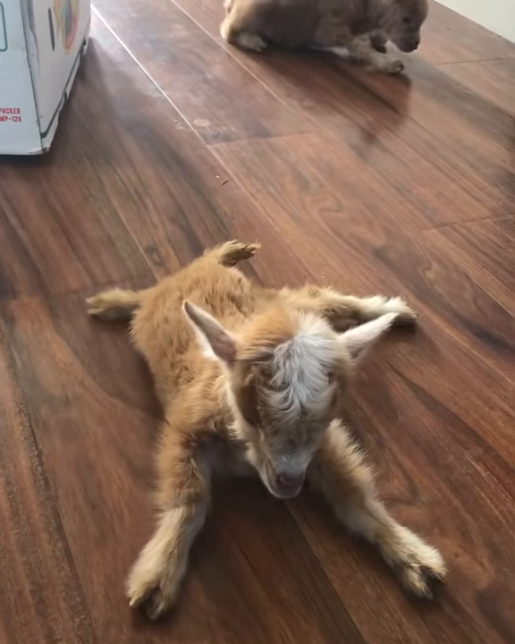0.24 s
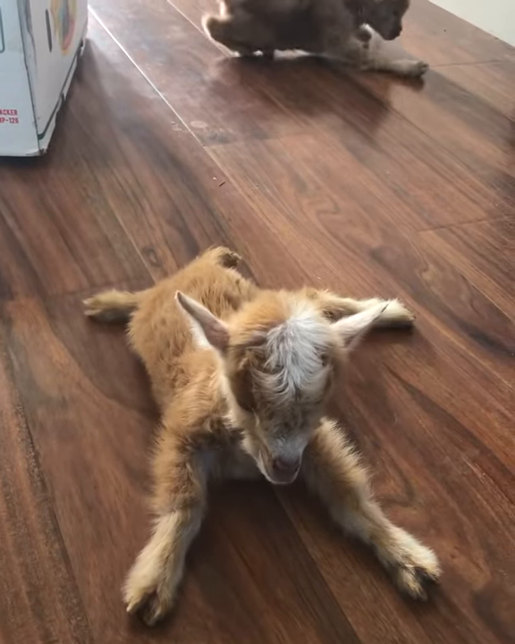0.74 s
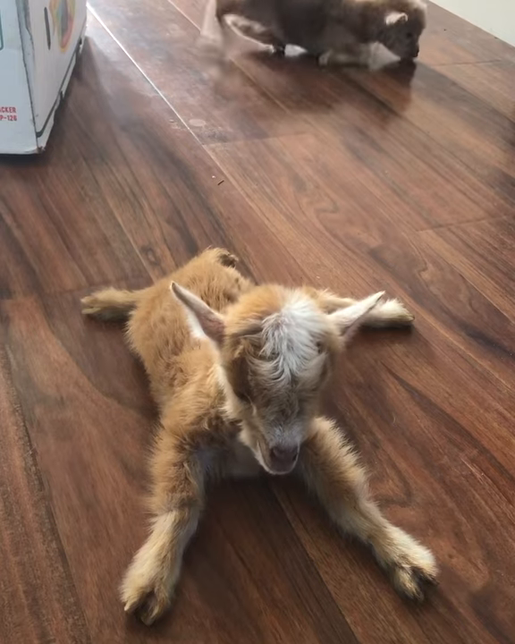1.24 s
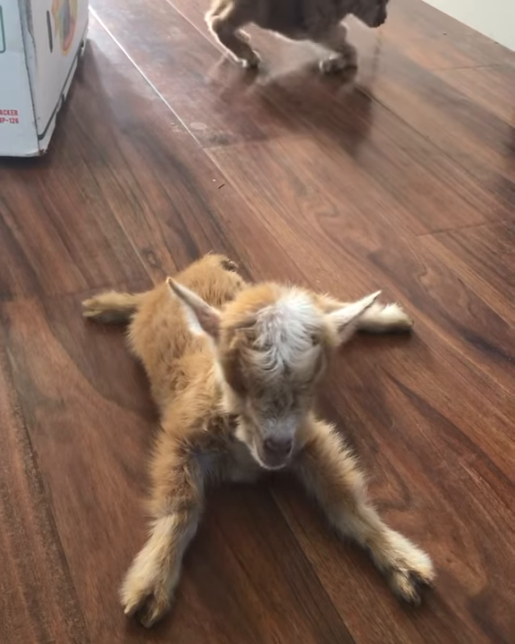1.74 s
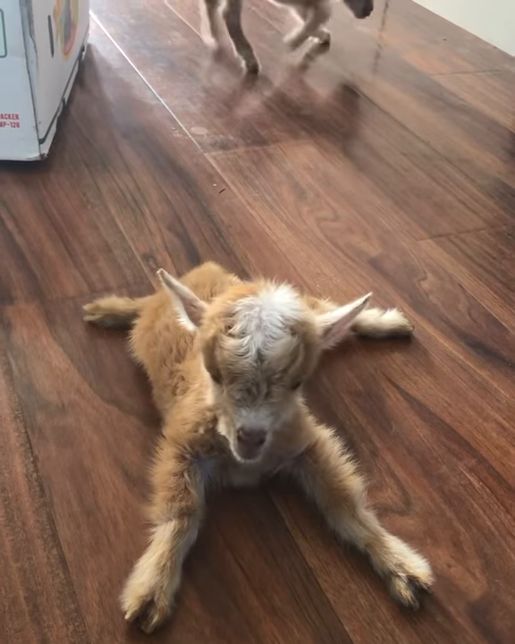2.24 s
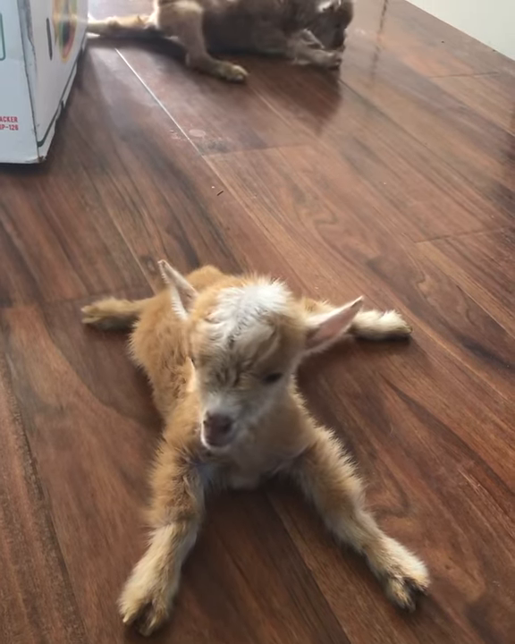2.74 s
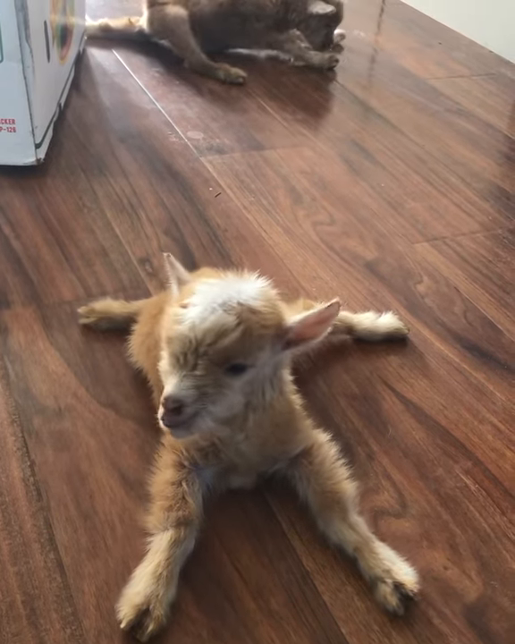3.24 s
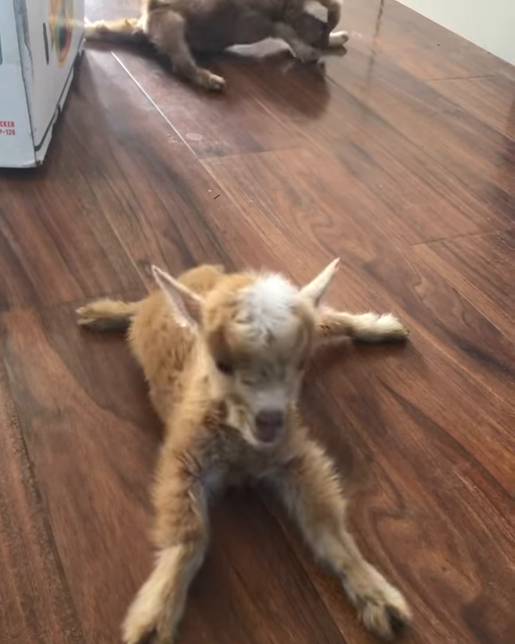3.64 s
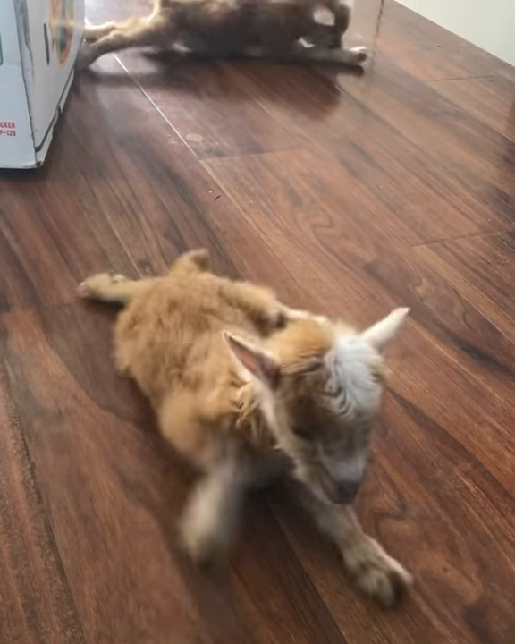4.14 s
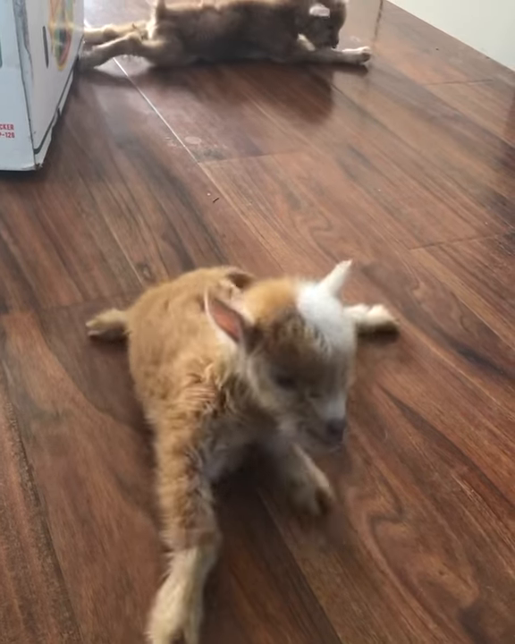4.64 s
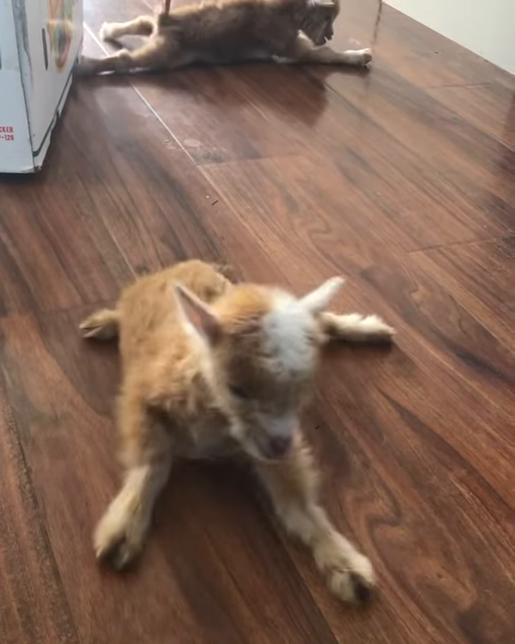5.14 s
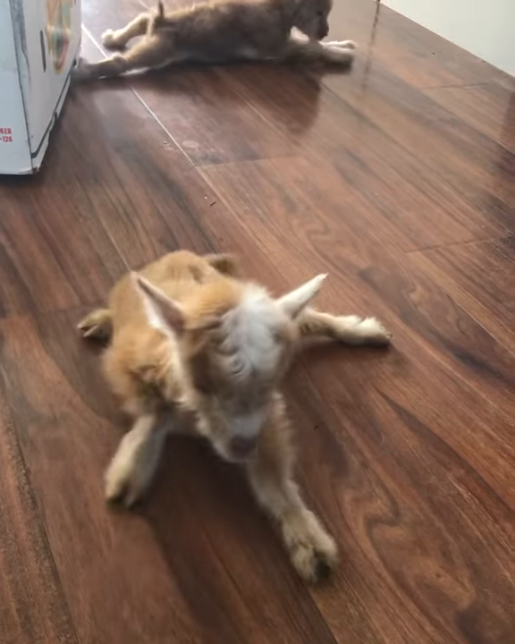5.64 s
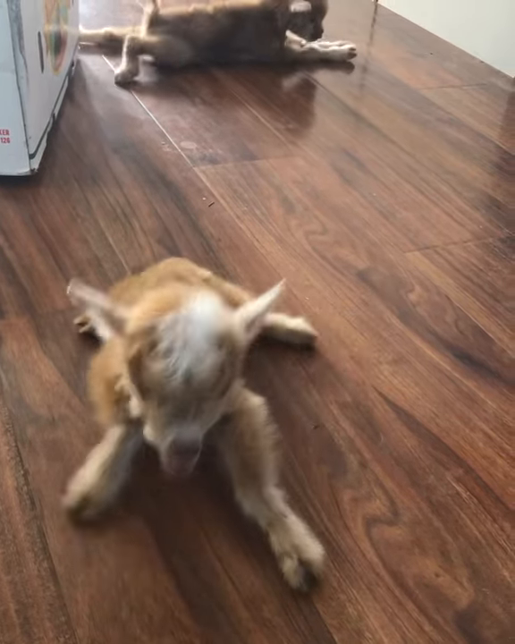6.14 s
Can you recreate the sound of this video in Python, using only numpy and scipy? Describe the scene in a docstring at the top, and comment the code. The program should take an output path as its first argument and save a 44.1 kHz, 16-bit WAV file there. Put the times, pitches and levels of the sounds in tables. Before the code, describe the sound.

A quiet room with low, steady air and a very faint thin appliance whine, heard through one close microphone, centred. At first only faint scuffs; from 0.9 to 1.3 s another kid stumbles farther off, with small hoof ticks, dull plank knocks and low floor rumble. A light knock at 2.35 s leads to a heavy woody thud at 2.57 s. The near goat kid then hums through closed lips and bleats, thin, high and nasal: short at 2.9 s, slightly longer at 3.5 s, the longest and quivering from 4.07 to 4.5 s, and a clipped one at 4.84 s. Hooves knock and scrape around 4.0 s, tap at 4.4 s, slide softly at 4.65 and 5.25 s, and click sharply at 5.4 s. From 5.56 to 6.15 s a strained, higher squeal swells, cracking twice into a whistle-like register and settling loud and clearer. A short scuff at 6.2 s and a tiny hoof squeak at 6.33 s end it.

```python
"""Newborn goat bleating on a plank floor

Close on a kid in a quiet room: four thin bleats led in by hums, then a squeal that cracks between registers.
The voice is a stack of harmonics under throat resonances, with rasping breath. Hooves tick (noise bursts) and
slide (swelling friction noise); a second kid stumbles and drops, heard as ringing planks and floor rumble.
Low room air and a faint appliance whine lie behind; one microphone feeds both sides."""
import sys
import numpy as np
from scipy import signal
from scipy.fft import rfft, irfft, next_fast_len
from scipy.io import wavfile
from scipy.ndimage import map_coordinates

SR = 44100
rng = np.random.default_rng(int(sys.argv[2]) if len(sys.argv) > 2 else 0)


def inscribe(sig):
    """Save sig as 16-bit PCM at rate SR to the path in sys.argv[1].

    A 1-D sig is mono; a 2-D sig holds one channel per row.
    Samples are clipped to [-1, 1] before scaling.
    """
    pcm = np.round(np.clip(np.atleast_2d(sig).T, -1, 1) * 32767)
    wavfile.write(sys.argv[1], SR, pcm.astype(np.int16))


N = 281358
TIME = np.arange(N) / SR
CUTOFF_HZ = 15750
BLEAT_ROOM_DB = -3   # room on the bleats and hums, relative to the direct voice


def from_db(db):
    """Decibels to gain."""
    return 10 ** (np.asarray(db) / 20)


def rms_one(x):
    """Scale to unit power."""
    return x / np.sqrt(np.mean(x ** 2) + 1e-20)


def in_time(rows, t):
    """Each column of a curve at the times t."""
    s, *columns = np.transpose(rows)
    return [np.interp(t, s, column) for column in columns]


def at_hz(points, hz):
    """Read a spectrum on a log-frequency axis."""
    f, value = np.transpose(points)
    return np.interp(np.log(hz), np.log(f), value)


def drift(rate, size):
    """Smooth chance that takes a new value rate times a second (below 2000); rms 1."""
    at = np.arange(size) * rate / SR
    values = rng.standard_normal(size // 20 + 4)
    return rms_one(map_coordinates(values, [at], order=3, mode="nearest"))


def coloured(x, spectrum):
    """Give a noise the stated spectrum; rms 1."""
    size = next_fast_len(len(x))
    hz = np.maximum(np.fft.rfftfreq(size, 1 / SR), 1)
    shaped = rfft(x, size) * from_db(at_hz(spectrum, hz))
    return rms_one(irfft(shaped, size)[:len(x)])


def add(track, s, sound):
    """Mix a sound into a track at a time."""
    start = max(int(s * SR), 0)
    track[start:start + len(sound)] += sound[:max(N - start, 0)]


def swell(s, length, db):
    """A bell-shaped gain centred on a moment."""
    return from_db(db) * np.exp(-2 * ((TIME - s) / length) ** 2)


def ease(elapsed, span_s):
    """Falls from 1 to 0 over a span and lands softly."""
    return np.clip(1 - elapsed / span_s, 0, 1) ** 2


def room(x, wet_db):
    """Strong early echoes from floor and walls thicken into a tail that dies band by band."""
    # Each row: frequency in Hz, time to fall 60 dB in seconds.
    room_t60 = [(100, 0.45), (1000, 0.64), (3000, 0.55), (6000, 0.54), (10000, 0.51), (16000, 0.1)]
    first_echo_s, early_s = 0.0044, 0.13
    t, tail = TIME[:SR], 0
    edges = np.geomspace(45, 19000, 13)
    for low, high in zip(edges, edges[1:]):
        band_pass = signal.butter(2, [low, high], "band", fs=SR, output="sos")
        band = signal.sosfilt(band_pass, rng.standard_normal(len(t)))
        tail = tail + band * from_db(-60 * t / at_hz(room_t60, np.sqrt(low * high)))
    tail = tail * (t > first_echo_s) * (1 + np.exp(-t / early_s))
    tail /= np.sqrt(np.sum(tail ** 2))
    return x + from_db(wet_db) * signal.fftconvolve(x, tail)[:len(x)]


def air():
    """Low steady room noise, with a thin appliance whine of slowly wandering sines."""
    # The air of the room. Each row: frequency in Hz, density in dB per Hz (relative).
    air_colour = [(18, -40), (30, 5.5), (53, -8.5), (123, -11.5), (156, 0), (284, -11.5), (455, -15),
                  (787, -22.5), (874, -23.5), (1970, -31.5), (2420, -37), (2760, -34.5), (4090, -37.5),
                  (11900, -47.5), (15500, -42)]
    # The whine. Each row: frequency in Hz, level in dB rms.
    whine_tones = [(2870, -86), (3500, -87.5), (11800, -90)]
    air_db = -55.5   # rms
    whine = 0
    for hz, db in whine_tones:
        whine += from_db(db) * np.sqrt(2) * np.sin(2 * np.pi * hz * TIME + drift(34, N))
    return from_db(air_db) * coloured(rng.standard_normal(N), air_colour) + whine


def shifts():
    """The floor rumbles, as swells of low noise, under a body shifting its weight on the boards."""
    # Each row: centre in seconds, time from centre to -17 dB in seconds, peak gain in dB.
    weight_shifts = [(0.87, 0.11, -79), (1.04, 0.11, -50), (1.216, 0.088, -70), (4.031, 0.029, -49.5)]
    # Each row: frequency in Hz, density in dB per Hz (relative).
    rumble_colour = [(45, 1), (110, -5.5), (190, -1), (280, -3), (450, -22), (1000, -16), (3000, -62)]
    envelope = sum(swell(*row) for row in weight_shifts)
    return envelope * coloured(rng.standard_normal(N), rumble_colour)


def ring(modes, scale):
    """Struck modes die away as sines, each with a chance strength of its own."""
    t, out = TIME[:SR // 2], 0
    spread_db = 2
    for k, (hz, db, t60) in enumerate(modes):
        strength = (-1) ** k * from_db(db + spread_db * rng.standard_normal())
        decay = np.exp(-np.log(1000) * t / t60)
        out = out + strength * decay * np.sin(2 * np.pi * hz * scale * t)
    return out


def knocks():
    """Knees and hooves land: each blow rings a plank; a heavy one also moves the whole floor."""
    # Each row: start in seconds, level in dB, boom of the floor against the plank in dB,
    # pitch of the struck plank as a ratio.
    blows = [(1.001, -48, 6, 0.86), (1.063, -46.5, 11.5, 1), (1.206, -43.5, 1, 0.9),
             (1.3, -54.5, -14, 1.37), (2.354, -48.5, 5, 1), (2.566, -31.5, 2.5, 0.98),
             (3.929, -50.5, -30, 1.01), (4.02, -41.5, -26, 0.72), (4.386, -49, -20, 0.93)]
    # The board's modes, then the floor's. Each row: frequency in Hz, strength in dB, 60 dB decay in seconds.
    plank_modes = [(275, -5, 0.033), (406, -1, 0.04), (482, 0, 0.026), (600, 1, 0.02), (934, 3.5, 0.0091),
                   (1100, -4, 0.024), (1360, -3, 0.0058), (1740, -11, 0.0063)]
    boom_modes = [(74, -36, 0.25), (106, -5.5, 0.13), (129.4, -11, 0.18), (189, -7.5, 0.063)]
    out = np.zeros(N)
    for s, level_db, boom_db, scale in blows:
        blow = ring(plank_modes, scale) + from_db(boom_db) * ring(boom_modes, 1.0)
        add(out, s, from_db(level_db) * blow)
    return out


def scuffs():
    """Grainy friction swells and fades with each slide of hoof and fur; once a hoof sticks and squeaks."""
    # Each row: centre in seconds, time from centre to -17 dB in seconds, gain in dB.
    slides = [(0.083, 0.25, -75), (0.686, 0.28, -76), (0.918, 0.13, -73), (1.1, 0.27, -69),
              (1.286, 0.089, -73.5), (2.222, 0.12, -75.5), (2.43, 0.21, -68.5), (3.915, 0.061, -61.5),
              (4.033, 0.031, -56), (4.65, 0.17, -64.5), (5.242, 0.13, -64), (5.462, 0.14, -69.5),
              (6.205, 0.042, -50)]
    # Each row: frequency in Hz, density in dB per Hz (relative).
    friction_colour = [(800, -11), (2000, 6.5), (4200, 5.5), (6500, -1.5), (10000, -4.5), (15000, -2.5)]
    # A hoof catching on the lacquer: centre in seconds, time to -17 dB in seconds, pitch in Hz, peak dB.
    squeak = (6.328, .009, 3400, -53)
    grain_db, waver_rad = 3.5, 1.0
    grains = rng.standard_normal(N) * from_db(grain_db * drift(220, N))
    hiss = sum(swell(*row) for row in slides) * coloured(grains, friction_colour)
    s, length, hz, db = squeak
    tone = np.sin(2 * np.pi * hz * TIME + waver_rad * drift(400, N))
    return hiss + swell(s, length, db) * tone


def ticks():
    """Hoof tips tap, horn on lacquer: cracks of decaying noise, most a few milliseconds long."""
    # Each row: start in seconds, level in dB before the trim below, decay to 1/e in seconds.
    taps = [(.875, -46.5, 0.0024), (0.961, -53, 0.011), (1.064, -48, 0.01), (1.299, -43, 0.002),
            (2.354, -44, 0.0031), (2.572, -49.5, 0.0044), (3.448, -49, 0.0036), (3.987, -43.5, 0.0039),
            (5.402, -36.5, 0.00041), (5.436, -51.5, 0.0022), (6.328, -65, 0.0013)]
    # Each row: frequency in Hz, density in dB per Hz (relative).
    tap_colour = [(1000, -3.5), (2500, -17.5), (4200, 1.5), (6500, -13.5), (10000, -23), (15000, -8)]
    trim_db = -5
    out, t = np.zeros(N), TIME[:SR // 20]
    for s, db, decay_s in taps:
        crack = np.exp(-t / decay_s) * coloured(rng.standard_normal(len(t)), tap_colour)
        add(out, s, from_db(db + trim_db) * crack)
    return out


def cry(t, pitch, level_db, nasal_db, bright_db, roughness, tract=1, lifts_db=(), knee=9):
    """The vocal folds give a stack of harmonics that slides under the throat's resonances."""
    # Throat and mouth, strongest near 2.8, 5.6 and 8 kHz. Each row: frequency in Hz, gain in dB.
    throat = [(700, -16.5), (950, -21.5), (1400, -17), (1900, -15.5), (2300, -5.5), (2750, 0), (3900, -14),
              (4800, -14.5), (5600, -5), (6700, -12.5), (7800, -12), (10500, -15.5), (13000, -19.5),
              (15500, -17)]
    # The resonances that lifts_db raises. Each row: centre in Hz, width (to 1/e of the lift) in octaves.
    resonances = [(2850, 0.39), (5600, 0.27), (8200, 0.55)]
    release_s, release_db = 0.028, -6
    jitter, quaver, shimmer = 0.058, 0.003, 0.8   # shares of pitch, pitch and strength
    flutter_db, closing_db, even_db = 3.0, -18, -8   # closing is per octave above the knee
    rasp_db, rasp_hz, fade_s = -9, 4500, 0.0049

    def chance(rate):
        return drift(rate, SR)[:len(t)]

    rough = np.clip(roughness, 0, 1) ** 2
    # as the pressure gives out, the treble goes first
    bright_db = bright_db + release_db * np.exp((t - t[-1]) / release_s)
    # in the top register the folds swing with weaker even harmonics
    whistle = np.clip((pitch - 1600) / 300, 0, 1)
    # hoarse folds close unevenly in time and in strength
    pitch = pitch * (1 + jitter * rough * chance(600) + quaver * chance(110.83))
    phase = 2 * np.pi * np.cumsum(pitch) / SR
    voice = 0
    for k in range(1, 21):
        hz = k * pitch
        fold_db = closing_db * max(np.log2(k / knee), 0) + whistle * even_db * (k % 2 == 0)
        # a closed mouth favours the low partials, a pressed voice the high ones
        nasal = np.clip(np.minimum(np.log2(2600 / hz), np.log2(hz / 500)), 0, 1)
        mouth_db = nasal_db * nasal + bright_db * np.clip(np.log2(hz / 3000), 0, 1)
        for (centre, width), lift_db in zip(resonances, lifts_db):
            mouth_db += lift_db * np.exp(-(np.log2(hz / tract / centre) / width) ** 2)
        throat_db = at_hz(throat, hz / tract)
        gain = from_db(throat_db + fold_db + mouth_db + flutter_db * chance(50.4))
        partial = np.sin(k * phase + rng.uniform(0, 2 * np.pi))
        voice += np.sqrt(2) * gain * (hz < CUTOFF_HZ) * partial
    voice *= 1 + shimmer * rough * chance(500)
    # turbulence comes in puffs, one per cycle
    puffs = rng.standard_normal(len(t)) * (1 + np.cos(phase))
    soft_puffs = signal.sosfilt(signal.butter(1, rasp_hz, fs=SR, output="sos"), puffs)
    rasp = from_db(rasp_db) * rough * coloured(soft_puffs, throat)
    fade = np.clip(np.minimum(t - t[0], t[-1] - t) / fade_s, 0, 1)
    return from_db(level_db) * fade * (voice + rasp)


def hums():
    """The voice starts behind closed lips and swells and brightens until the mouth opens."""
    # Each row: start in seconds, length in seconds, first pitch in Hz, last pitch in Hz,
    # level at the end in dB, nasal boost (full at 1-1.3 kHz) in dB.
    lead_ins = [(2.741, 0.11, 745, 827, -69, 40.5), (2.852, 0.062, 967, 952, -62, 39.5),
                (3.472, 0.049, 1132, 774, -74, 46.5), (4.028, 0.056, 686, 793, -64.5, 35.5),
                (4.788, 0.062, 593, 741, -47.5, 6.5)]
    swell_db, end_bright_db, opening_db, rough = 12.5, 2, 25, 0.41   # brightness is reached at 6 kHz
    out = np.zeros(N)
    for s, length, first_hz, last_hz, db, nasal_db in lead_ins:
        t = np.arange(0, length, 1 / SR)
        to_go = ease(t, length)
        pitch = last_hz + (first_hz - last_hz) * to_go
        bright_db = end_bright_db - opening_db * to_go
        add(out, s, cry(t, pitch, db - swell_db * to_go, nasal_db, bright_db, rough))
    return out


def bleats():
    """Each bleat scoops up, quivers on an arch of breath that sets level, colour and hoarseness, and drops."""
    # One push of breath per bleat. Each row: start in seconds, length in seconds, attack in seconds,
    # central pitch in Hz before the bends, scoop up and final drop as shares of pitch, glide in Hz per second,
    # quiver rate in Hz, quiver depth as a share, level in dB, roughness 0-1 at full breath,
    # nasal boost (full at 1-1.3 kHz) in dB, brightness (full from 6 kHz) in dB, scale of the resonances,
    # lifts of the three resonances in dB, harmonic number at which the fold pulse runs out.
    breaths = [(2.899, 0.19, 0.025, 979.3, 0.045, 0.0037, -110, 10, 0.0063, -36, 0.11, 1, 2.5, 0.94, (-1.3, -3, 1.8),
               10.4),
               (3.519, 0.25, 0.037, 961.6, 0.0726, 0.2, 61, 19.3, 0.007, -34.5, 0.09, -2.5, -2, 0.97, (-2, 3, 0),
               9.26),
               (4.071, 0.453, 0.034, 957.4, 0.22, 0.27, 3.5, 12, 0.0056, -32.5, 0.11, -1.5, 1.5, 0.97, (0.5, 1, 0.5),
               9.2),
               (4.838, 0.099, 0.027, 925, 0.3, 0.18, -100, 13.8, 0.0044, -35.5, 0.26, -3, -4, 0.95, (0, 6.3, 7.5),
               9.4)]
    scoop_s, drop_s = 0.042, 0.05   # the folds tighten, and slacken again
    # what slack breath at either end does, against the full push in the middle; the mouth is half shut
    slack_sag, slack_db, slack_bright_db, slack_nasal_db = 0.025, -6.5, 3.5, 5.5
    slack_lifts_db = (-2.5, 1.5, -7)
    attack_db, release_db = -31, -2   # level at the very start and end, below that of slack breath
    slack_rough, bend_rough = 0.43, 1.2   # added at the ends, and per share of pitch lost in scoop and drop
    out = np.zeros(N)
    for (s, length, attack_s, hz, scoop, drop, glide, quiver_hz, quiver, db, rough,
         nasal_db, bright_db, tract, lifts_db, knee) in breaths:
        t = np.arange(0, length, 1 / SR)
        slack = (2 * t / length - 1) ** 2
        dropping = ease(length - t, drop_s)
        bend = scoop * ease(t, scoop_s) + drop * dropping
        quivering = quiver * np.cos(2 * np.pi * quiver_hz * t)
        pitch = (hz + glide * (t - length / 2)) * (1 - bend - slack_sag * slack - quivering)
        level_db = db + slack_db * slack + attack_db * ease(t, attack_s) + release_db * dropping
        mouth_db = [lift + shut * slack for lift, shut in zip(lifts_db, slack_lifts_db)]
        voice = cry(t, pitch, level_db, nasal_db + slack_nasal_db * slack, bright_db + slack_bright_db * slack,
                    rough + slack_rough * slack + bend_rough * bend, tract, mouth_db, knee)
        # the head turns between bleats, so each meets other echoes
        add(out, s, room(np.pad(voice, (0, SR)), BLEAT_ROOM_DB))
    return out


def squeal():
    """A strained high cry that twice cracks into the top register before it settles."""
    # Each row: time in seconds, pitch in the lower register in Hz, level in dB.
    contour = [(5.557, 1226, -70), (5.598, 1500, -56.5), (5.625, 1398, -46), (5.655, 1796, -52.5),
               (5.703, 1474, -57.5), (5.744, 1446, -39.5), (5.775, 1524, -37.5), (5.794, 2030, -38.5),
               (5.809, 1520, -36), (5.869, 1447, -29.5), (5.897, 1500, -31.5), (5.936, 1403, -29),
               (5.955, 1329, -27.5), (6.051, 1299, -28.5), (6.132, 1355, -31), (6.156, 1810, -37.5)]
    # As it goes on the mouth opens. Each row: time in seconds, nasal boost (full at 1-1.3 kHz) in dB,
    # brightness (full from 6 kHz) in dB.
    mouth = [(5.62, 22.5, -4), (5.725, 30, -10), (5.74, -2, -7.5), (5.89, -19, -8.5), (5.99, -17.5, -1.5)]
    # The voice flips into its top register. Each row: from and to, in seconds.
    breaks = [(5.613, 5.735), (5.778, 5.835)]
    # It clears as it gets louder. Each row: level in dB, roughness 0-1.
    rough_at_level = [(-31.5, 0.39), (-29, 0.09)]
    break_ratio, break_s = 1.3, 0.011   # size and duration of the jump
    crack_rough, crack_s = 0.16, 0.0076   # the folds rattle around each jump
    out, t = np.zeros(N), np.arange(contour[0][0], contour[-1][0], 1 / SR)
    pitch, level_db = in_time(contour, t)
    nasal_db, bright_db = in_time(mouth, t)
    flipped = sum(np.clip(np.minimum(t - start, end - t) / break_s + .5, 0, 1) for start, end in breaks)
    rattle = sum(np.exp(-abs(t - s) / crack_s) for s in np.ravel(breaks))
    roughness = np.interp(level_db, *np.transpose(rough_at_level)) + crack_rough * rattle
    voice = cry(t, pitch * break_ratio ** flipped, level_db, nasal_db, bright_db, roughness,
                lifts_db=(1.5, -1.6, 4), knee=6.9)
    add(out, t[0], voice)
    return out


def goat():
    """All the cries; the room answers the bleats and their hums more than the squeal."""
    return room(hums(), BLEAT_ROOM_DB) + bleats() + room(squeal(), wet_db=-13.5)


def scene():
    """The knocks carry more room than the taps and scuffs; one microphone feeds both sides."""
    floor = room(knocks(), wet_db=-5.5) + shifts()
    hooves = room(ticks() + scuffs(), wet_db=-7.5)
    return np.tile(air() + floor + hooves + goat(), (2, 1))


def record(dry):
    """The microphone sheds the deep bass; the top is cut."""
    low_cut = signal.cheby1(8, .5, 45, "high", fs=SR, output="sos")
    top_cut = signal.ellip(12, .2, 80, CUTOFF_HZ, fs=SR, output="sos")
    return signal.sosfilt(top_cut, signal.sosfilt(low_cut, dry))


dry = scene()
out = record(dry)
inscribe(out)
```